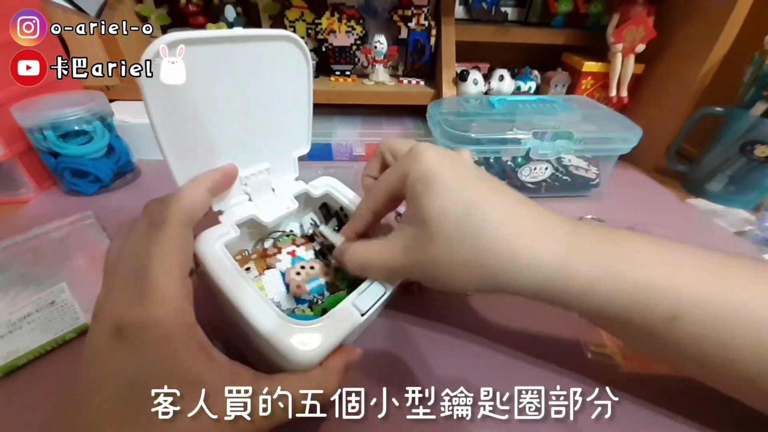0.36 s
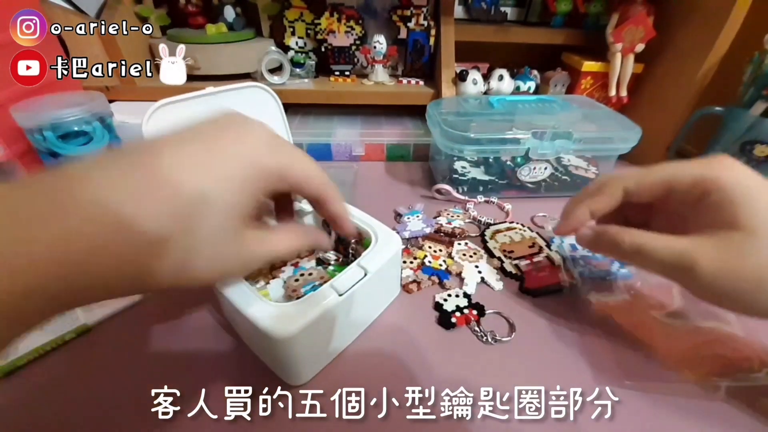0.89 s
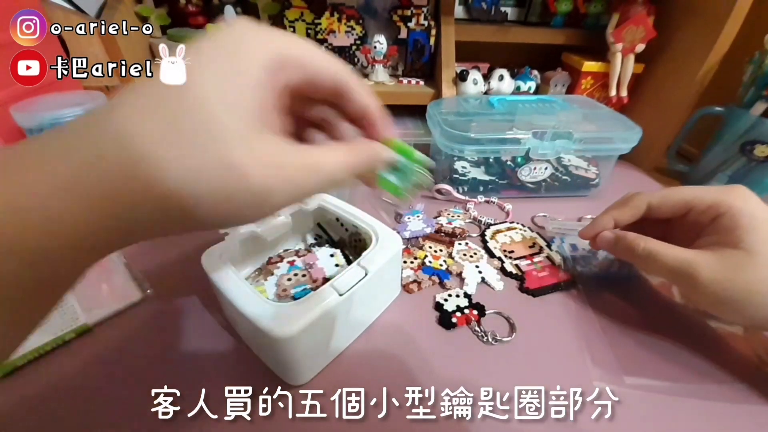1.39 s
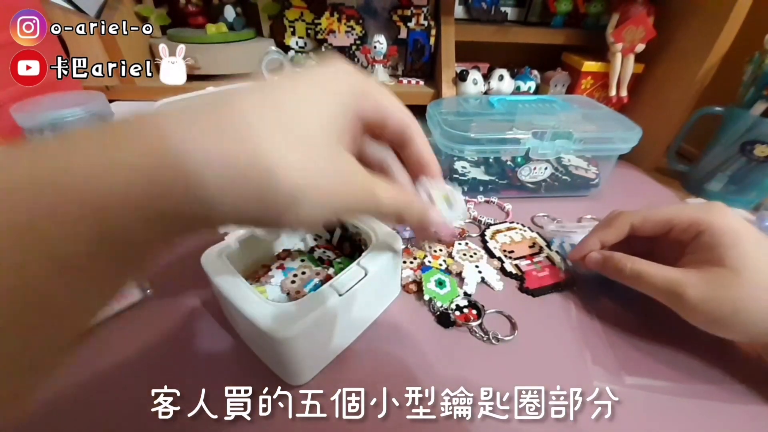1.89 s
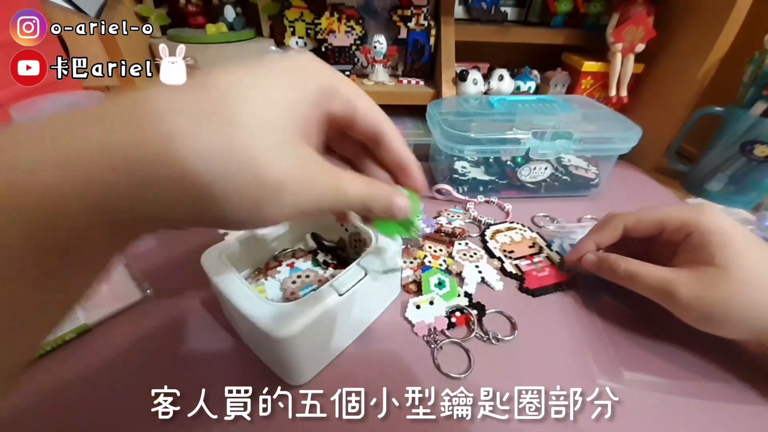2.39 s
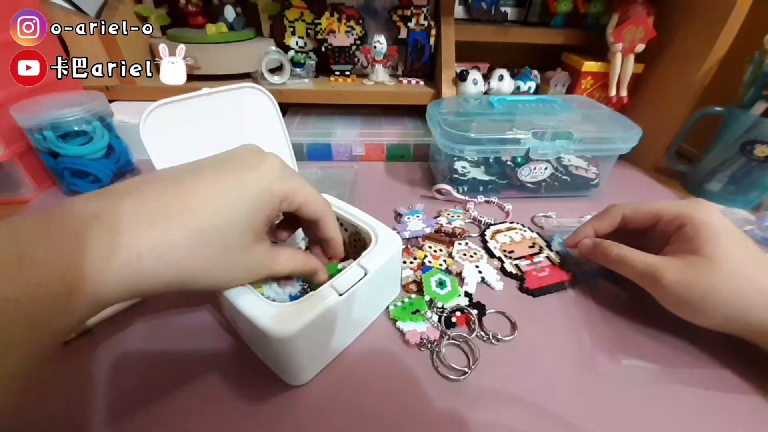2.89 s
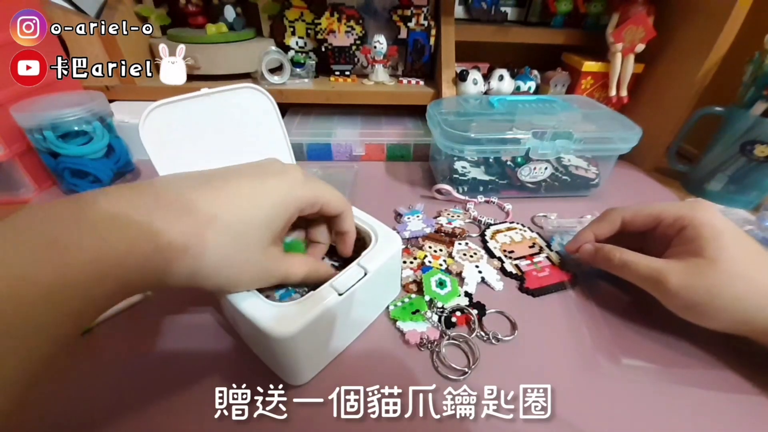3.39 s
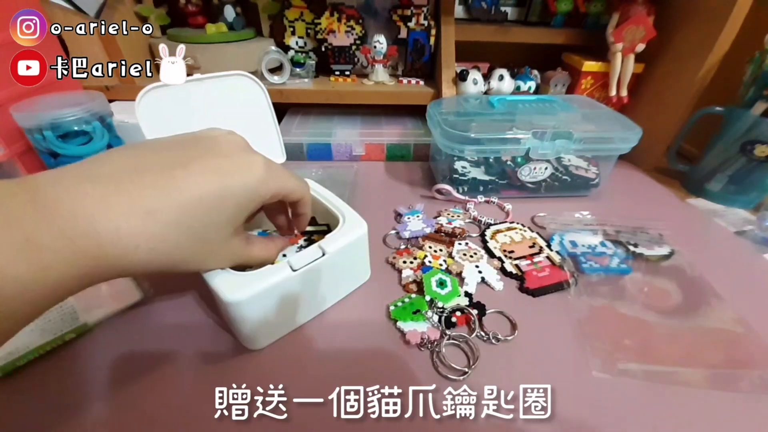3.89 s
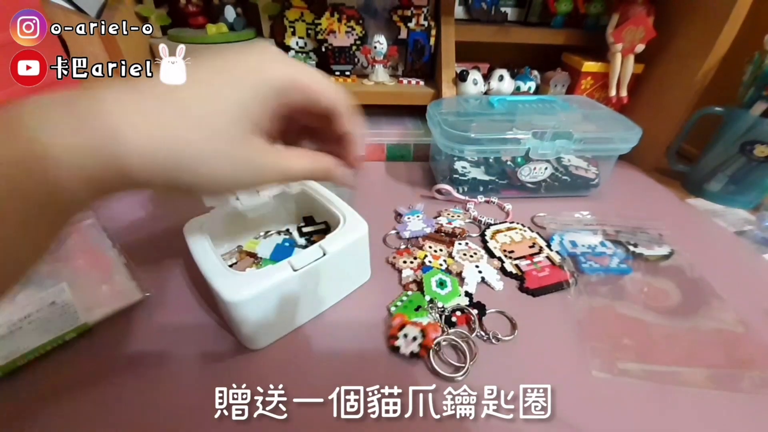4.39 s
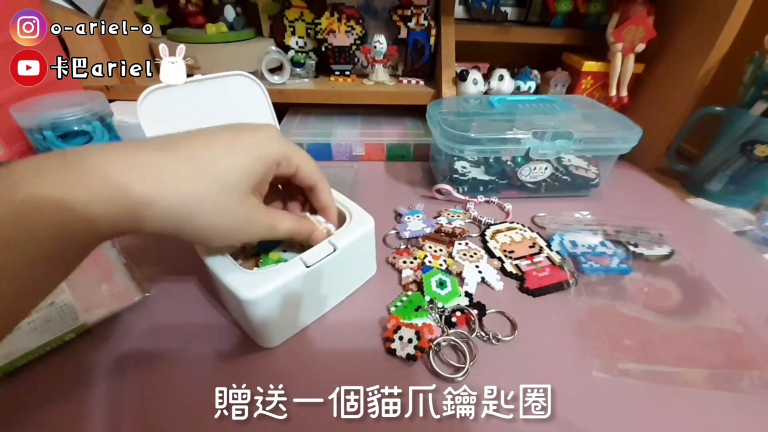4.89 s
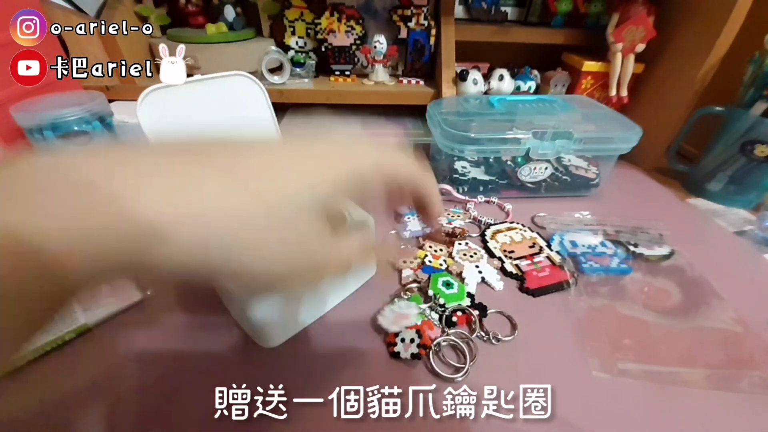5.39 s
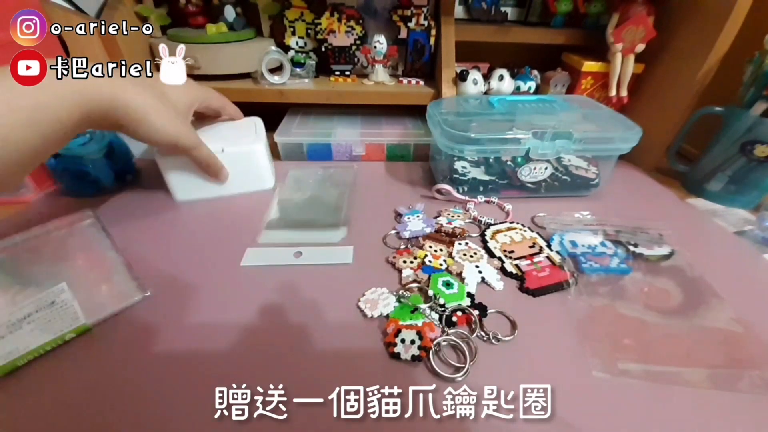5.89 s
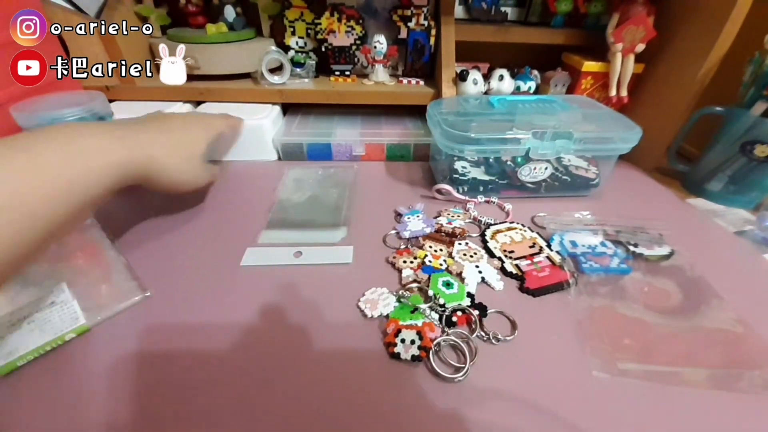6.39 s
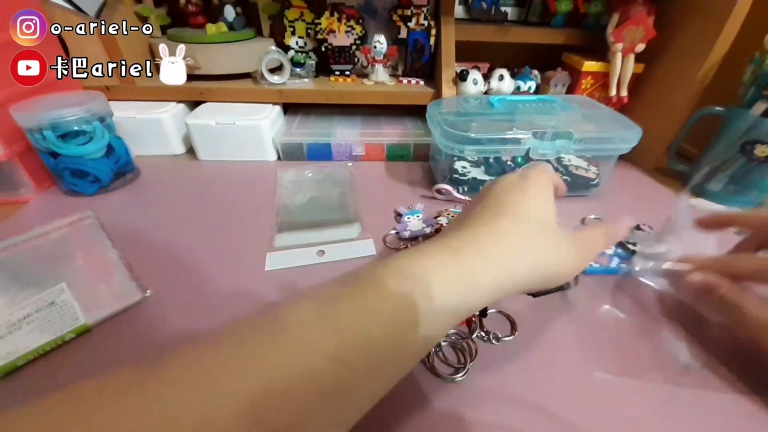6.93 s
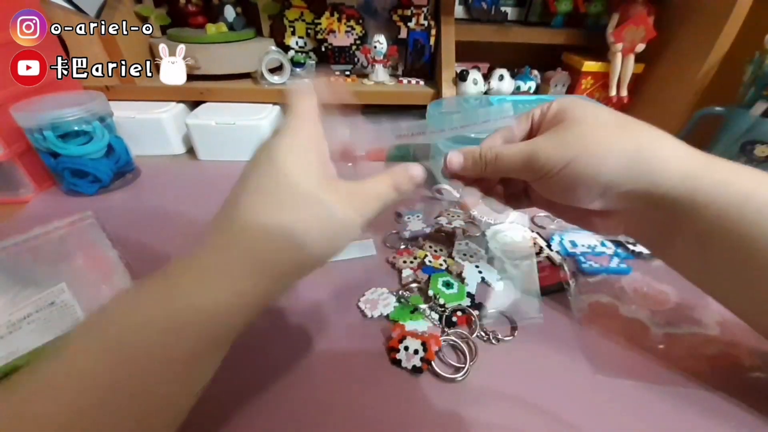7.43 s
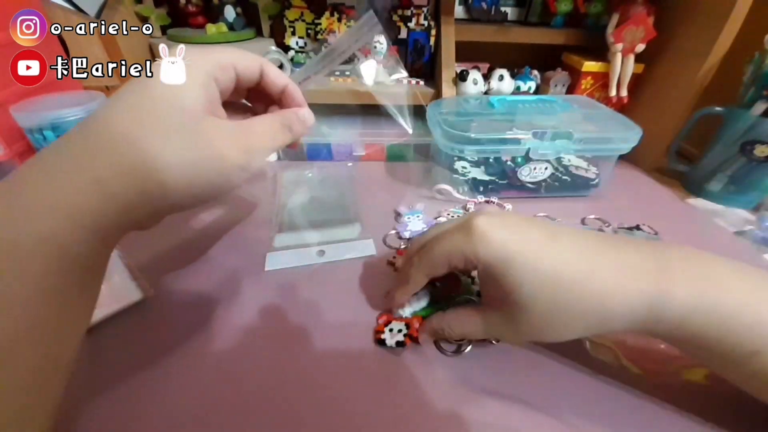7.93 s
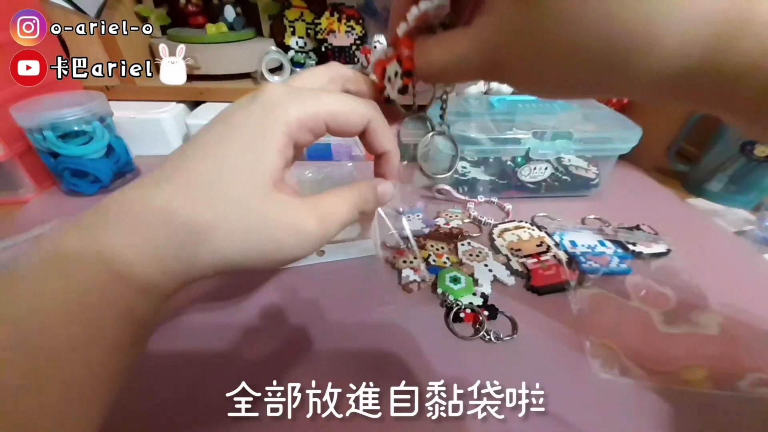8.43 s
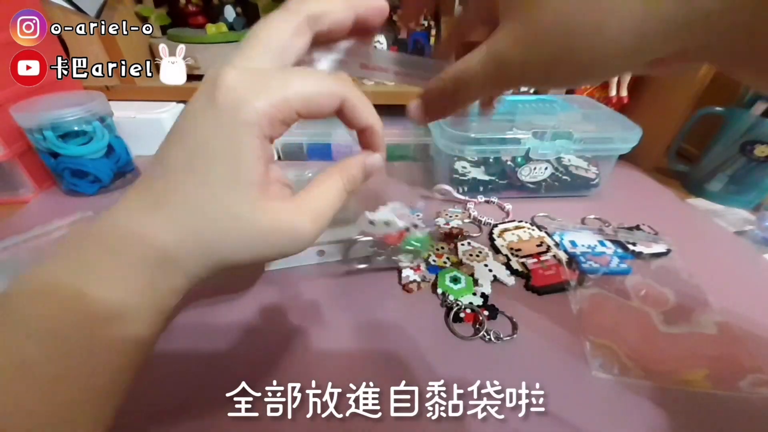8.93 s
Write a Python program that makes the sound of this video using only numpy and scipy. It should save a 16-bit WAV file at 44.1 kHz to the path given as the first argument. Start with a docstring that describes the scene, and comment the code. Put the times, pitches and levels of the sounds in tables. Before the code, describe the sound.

Dry, close stereo pickup at a table in a quiet small room, with faint air and microphone hiss. From 0 to 0.7 s a hollow plastic box opens with soft knocks and a light rattle. From 0.9 to 5.3 s fingers rummage through small plastic bead charms in uneven strokes, with bright ticking, hollow rattling and short woody clacks, strongest around 1.7 to 2.0, 3.2 and 4.6 to 5.1 s. Low air puffs buffet the left side around 2.7 to 3.2 and 4.3 to 4.6 s. At 5.56 s the lid snaps shut; contents rattle as the box is carried, and it lands with a loud hard crack at 6.07 s. Small settling taps fade into near silence around 6.4 s. From 6.8 s pieces tick, then thin film crinkles and pops from 7 s, with a weak puff near 8.2 s. At about 8.9 s a sharp bright snap and dense crackle end it.

```python
"""Small plastic bead charms are rummaged by hand in a hollow plastic box and dropped on a table; the box is shut and
shelved, then a clear film bag crinkles. Streams of random contacts ring resonances of box, table and film and colour
the beads; short notes and noise bursts make the single blows, snaps and cracks.
Air stirred by the passing arm buffets the left microphone port with low noise.
Close pickup in a quiet small room, two ports a few centimetres apart, over room air and microphone hiss."""
import sys
import numpy as np
from scipy import signal
from scipy.fft import rfft, irfft, next_fast_len
from scipy.io import wavfile
from scipy.ndimage import uniform_filter1d, map_coordinates

SR = 44100
rng = np.random.default_rng(int(sys.argv[2]) if len(sys.argv) > 2 else 0)


def convert_level_to_amplitude(level_db):
    """Map a level in decibels to its linear amplitude factor."""
    exponent = np.asarray(level_db, float) / 20
    return 10 ** exponent


def inscribe(sig):
    """Save sig as 16-bit PCM at rate SR to the path in sys.argv[1].

    A 1-D sig is mono; a 2-D sig holds one channel per row.
    Samples are clipped to [-1, 1] before scaling.
    """
    pcm = np.round(np.clip(np.atleast_2d(sig).T, -1, 1) * 32767)
    wavfile.write(sys.argv[1], SR, pcm.astype(np.int16))


N = 399105  # length in samples

# hand strokes through charms and film: start [t/s], length [t/s], hollow knock, bead tick, crackle [relative level/dB]
STROKES = [(0.0, 0.067, -52.5, -100, -70.5), (0.291, 0.175, -51.5, -61, -60),
           (0.463, 0.096, -55.5, -65, -62), (0.565, 0.2, -52, -77, -52), (0.93, 0.13, -52.5, -68, -80),
           (0.98, 0.37, -71.5, -63, -60), (1.138, 0.033, -46.5, -43.5, -49), (1.438, 0.08, -91, -78, -65),
           (1.504, 0.1, -49.5, -64.5, -46), (1.64, 0.1685, -49, -42.5, -45),
           (1.951, 0.084, -65, -56, -41.5), (2.123, 0.17, -43, -47, -50.5),
           (2.466, 0.087, -47.5, -54.5, -38.5), (2.752, 0.237, -48.5, -46, -47),
           (3.009, 0.154, -45.5, -44, -46.5), (3.171, 0.065, -39, -41.5, -46),
           (3.308, 0.1364, -44.5, -50.5, -53), (3.358, 0.061, -43.5, -38.5, -43.5),
           (3.454, 0.1625, -55.5, -56.5, -55.5), (3.768, 0.083, -65.5, -56.5, -62),
           (3.956, 0.088, -44, -44.5, -43), (4.059, 0.073, -47, -47, -46.5),
           (4.282, 0.042, -50.5, -85, -47.5), (4.345, 0.083, -48, -76, -44.5),
           (4.516, 0.067, -40, -40, -41.5), (4.683, 0.225, -38, -36.5, -43.5),
           (4.876, 0.275, -48.5, -48, -52.5), (5.258, 0.1475, -52.5, -78.5, -50),
           (5.419, 0.084, -57, -80.5, -70.5), (5.561, 0.036, -32, -42.5, -48),
           (5.597, 0.32, -53.5, -60, -63), (5.802, 0.26, -50, -50, -55), (6.087, 0.068, -58, -60, -66),
           (6.202, 0.19, -64, -123, -83), (6.773, 0.19, -71, -61, -57), (6.788, 0.097, -47, -43.5, -43.5),
           (7.057, 0.126, -48.5, -51, -64), (7.201, 0.102, -47, -47.5, -53), (7.368, 0.12, -58.5, -66, -74),
           (7.496, 0.05, -44, -45, -57), (7.532, 0.109, -50.5, -54, -51), (7.649, 0.085, -48.5, -46, -44.5),
           (7.74, 0.117, -65, -67, -63), (7.859, 0.113, -49, -52, -41), (7.964, 0.213, -57, -58, -52.5),
           (8.182, 0.065, -75, -60.5, -54), (8.341, 0.089, -52, -51, -50), (8.496, 0.098, -64, -63.5, -57),
           (8.639, 0.23, -58.5, -57.5, -55), (8.84, 0.048, -38, -30.5, -23), (8.88, 0.089, -36, -35, -26),
           (8.959, 0.154, -40.5, -40.5, -35.5)]
# pieces jolted into a short rattle: time of the jolt [t/s], hollow knock, bead tick, crackle [relative level/dB]
RATTLES = [(0.139, -52, -51, -45.5), (0.169, -38.5, -36.5, -38.5), (0.353, -60, -44, -44),
           (0.413, -36, -34, -36), (0.451, -78, -43.5, -34.5), (0.659, -38.5, -81, -54),
           (1.051, -31.5, -29, -35), (1.106, -31, -36.5, -39.5), (1.264, -39, -31, -30.5),
           (1.31, -35, -56, -54), (1.564, -37, -44.5, -27.5), (1.753, -32, -43, -42.5),
           (2.174, -38, -29, -37), (2.326, -46, -40, -44), (2.523, -32, -47, -30), (2.826, -41, -40, -45),
           (3.117, -34.5, -36.5, -41), (3.278, -41.5, -42.5, -42), (3.65, -53, -41, -47),
           (4.005, -29.5, -25.5, -28.5), (4.157, -30, -42.5, -53), (4.182, -30.5, -53, -65),
           (4.378, -39.5, -62, -30), (4.79, -30, -26, -33.5), (4.882, -52, -50, -38),
           (5, -29.5, -30.5, -35), (5.039, -37, -39.5, -42), (5.364, -71, -73, -35.5),
           (5.679, -34.5, -52, -52), (5.76, -41.5, -37, -42.5), (5.858, -26.5, -30, -35.5),
           (5.911, -26.5, -26.5, -36), (5.973, -28, -34.5, -41.5), (6.118, -37, -66, -59),
           (6.209, -42.5, -62, -61), (7.132, -56, -51, -36), (7.417, -34.5, -44.5, -45.5),
           (7.514, -47, -29, -16.5), (7.908, -36, -49, -38), (8.228, -34.5, -44, -55),
           (8.471, -38.5, -40, -44), (8.534, -50, -54, -39), (8.885, -17.5, -27, -22.5)]
# single blows: start [t/s], knock [relative level/dB], knock pitch [f/Hz], snap, table thud [relative level/dB]
BLOWS = [(0.016, -26.5, 494, -72, -58), (0.19, -48, 135, -80, -51), (0.538, -22, 1430, -27.5, -83),
         (0.586, -37, 610, -53.5, -40.5), (1.224, -32.5, 720, -36, -80), (1.354, -24.5, 600, -38, -64),
         (1.713, -13, 1420, -42, -77), (1.89, -13, 1306, -24.5, -54), (2.008, -12, 1230, -28, -43.5),
         (2.406, -22.5, 1190, -33.5, -70), (2.479, -24.5, 1430, -54, -42), (2.781, -23, 750, -17, -70),
         (3.207, -13.5, 1740, -27.5, -50), (4.557, -27.5, 486, -19, -61), (4.656, -14.5, 795, -27.5, -68),
         (4.769, -19, 690, -15.5, -64), (5.116, -18.5, 1510, -22, -55), (5.278, -28, 1190, -38, -53),
         (5.52, -29.5, 1310, -21.5, -60), (5.565, -18, 607, -29.5, -30.5), (5.726, -29.5, 1000, -28.5, -78),
         (5.906, -29, 450, -22, -30), (6.072, -9, 730, -17, -18), (6.313, -31, 522, -48.5, -33.5),
         (7.955, -25.5, 1460, -35, -90), (8.445, -32, 1066, -28, -44), (8.778, -34.5, 553, -20, -38),
         (8.9275, -20, 1290, -10.5, -30.5)]
# small clacks of one piece on the hollow box: start [t/s], knock [relative level/dB], pitch [f/Hz]
TAPS = [(0.229, -44.5, 930), (0.937, -34.5, 776), (0.987, -33.5, 710), (1.517, -41, 1410),
        (1.794, -28, 1220), (1.997, -23, 1370), (4.635, -29.5, 765), (4.679, -26, 770), (4.729, -32, 686),
        (4.797, -26, 735), (4.811, -35, 760), (4.836, -31, 750), (4.886, -27, 770), (4.898, -46, 790),
        (5.078, -46, 774), (5.211, -26, 1320), (5.838, -32, 500), (5.955, -29.5, 430), (6.034, -32, 413),
        (6.168, -40.5, 544), (6.234, -39, 510), (6.287, -35.5, 400)]
# a tap is a blow without snap or thud
KNOCKS = BLOWS + [(start, db, hz, -np.inf, -np.inf) for start, db, hz in TAPS]
# rattle left by a blow: knock over the blow's knock, tick over its snap, crackle over its snap [level/dB]
AFTER_BLOW_DB = (-7.5, -10.5, -6)
# single ticks of rings and beads, creases of the bag popping: start [t/s], bright part, body [relative level/dB]
SNAPS = [(0.68, -23.5, -54), (1.341, -48, -25.5), (1.455, -40, -68), (1.476, -37, -59), (6.469, -52, -62),
         (6.814, -11, -33), (6.911, -24, -27), (7.075, -19.5, -48), (7.234, -22, -19.5), (7.388, -55, -54),
         (7.4128, -31, -36), (7.431, -42, -23.5), (7.4845, -60, -34), (7.5102, -16.5, -25),
         (7.5287, -26, -20.5), (7.582, -18.5, -49), (7.6, -26.5, -43), (7.618, -46, -23), (7.702, -24, -32),
         (7.7154, -29, -25), (7.7308, -28, -29), (7.7694, -32, -51), (7.8163, -41, -52), (7.9086, -26, -41),
         (8.031, -26, -32), (8.0877, -32, -52), (8.133, -24.5, -35.5), (8.2073, -36, -58),
         (8.3515, -14, -66), (8.4054, -26, -29), (8.46, -20.5, -25.5), (8.682, -22.5, -33),
         (8.7098, -26, -36), (8.7394, -28, -60), (8.7694, -13.5, -16), (8.9369, 5, -35), (8.972, -17, -33)]
# hard cracks as the lid shuts and the box hits the shelf: start [t/s], crack [relative level/dB]
LANDINGS = [(5.566, -17.5), (6.07, -1.5)]
# gusts on the left port, a list of points for each: time [t/s], low push [level/dB]
GUSTS = [
    [(2.63, -67), (2.69, -22), (2.77, -20), (2.83, -29.5), (2.94, -28.5), (3.01, -45.5), (3.06, -33.5),
     (3.12, -43), (3.15, -28.5), (3.21, -33), (3.27, -61.5)],
    [(4.2, -51), (4.3, -36.5), (4.43, -31), (4.46, -19), (4.5, -18), (4.525, -26), (4.56, -16.5),
     (4.61, -16.5), (4.65, -53)],
    [(7.98, -48), (8.02, -39.5), (8.1, -53.5), (8.18, -25.5), (8.25, -63)],
]

# spans in which the whole box is opened, shut or carried: from [t/s], to [t/s]
BOX_MOVED = [(0, .8), (5.45, 6.45)]
# where the pieces knock: time [t/s], share on the deep floor of the box [0-1; the rest on its wall or the table]
FLOOR_SHARE = [(0, 0.87), (.25, 0.38), (.56, 0.1), (.6, 0.83), (.66, 0.2), (.94, 0.67), (1.4, 0.39),
               (1.5, 0.36), (2.8, 0.42), (4.1, 0.33), (4.5, 0.45), (4.63, 0.45), (5.06, 0.31), (5.15, 0.25),
               (5.48, 0.4), (5.62, 0), (6.4, 0.79), (6.7, 0.35)]
# how much earlier the left port hears the sources: time [t/s], lead [t/ms]
LEFT_LEAD = [(6.4, 0.2167), (6.7, 0.027)]

# hollow box, two floor resonances and then one of the wall: centre [f/Hz], width [f/Hz], relative level [level/dB]
BOX = [(508, 80, -12.5), (765, 118, -10.5), (1375, 580, 0)]
# the whole box rocking and sliding: centre [f/Hz], width [f/Hz], relative level [level/dB]
SHELL = [(400, 120, -4.5), (628, 130, 1)]
# cracking walls of the box: centre [f/Hz], width [f/Hz], relative level [level/dB]
WALLS = [(1360, 570, 5.5), (2640, 450, 6), (3970, 1400, -2.5)]
# table top: centre [f/Hz], width [f/Hz], relative level [level/dB]
TABLE = [(135, 96, 13), (233, 74, 6.5), (350, 76, 10)]
# colour of the bead charms: frequency [f/Hz], relative level [level/dB]
BEADS = [(1700, -7.5), (2400, 4), (3200, 0), (4400, -0.5), (5500, -6), (7000, -6), (8200, -25.5)]
# colour of the bright crackle: frequency [f/Hz], relative level [level/dB]
CRACKLE = [(6800, -7), (7900, 1.5), (8400, 5.5), (10000, 4), (15500, 0)]
# dull body of the film bag: frequency [f/Hz], relative level [level/dB]
FILM = [(45, -41), (120, 11.5), (350, 11.5), (900, -1), (2300, -49)]
# fine wrinkles of the film: frequency [f/Hz], relative level [level/dB]
CREASES = [(1500, -5.5), (2500, -0.5), (7500, -6.5), (8300, -16)]
# low push of a gust: frequency [f/Hz], relative level [level/dB]
LOW_GUST = [(15, -21.5), (40, 1.5), (100, 12), (220, -8), (400, -82)]
# faster flutter of a gust: frequency [f/Hz], relative level [level/dB]
FLUTTER = [(90, -18), (160, -1), (300, -6), (620, -28.5), (900, -57)]
# room air and microphone hiss: frequency [f/Hz], relative density [level/dB]
HUSH = [(25, -33.5), (55, -15.5), (92, -23), (123, -9.5), (195, -30), (249, -26), (714, -39), (7600, -49.5),
        (8800, -41.5), (11000, -41.5), (15500, -47.5)]

SHUT_AT, BAG_FROM = 5.56, 7.0  # the lid closes, the bag comes out (s)
STROKE_RISE_S, STROKE_FALL_S = 0.019, 0.019
STROKE_FADE_DB = -1  # a stroke tires by this from start to end
RATTLE_LEAD_S, RATTLE_RISE_S, RATTLE_T60 = 0.014, 0.019, 0.079  # starts ahead of its time, builds and dies (s)
AFTER_RISE_S, AFTER_T60 = 0.0043, 0.057  # the rattle left by a blow starts with it and dies (s)
CRACK_RISE_S, CRACK_T60 = 0.0041, 0.046  # (s)
FLUTTER_EVEN_DB, FLUTTER_GROWS = -18, 1.92  # push level where the flutter equals it; dB of flutter per dB of push
ROOM_T60 = 0.015  # nearby table, box and shelf (s)
HUSH_DB = -64.5  # rms of the two ports' average


def unit(x):
    """Scaled to rms 1."""
    return x / np.sqrt(np.mean(x ** 2) + 1e-20)


def along(points, hz):
    """Interpolates (Hz, value) points on a log frequency axis."""
    f, v = np.transpose(points)
    return np.interp(np.log(hz + 1), np.log(f + 1), v)


def curves(rows):
    """One value per sample for each column after the time; -120 dB outside."""
    s, *cols = np.transpose(rows)
    return [np.interp(np.arange(N) / SR, s, c, -120, -120) for c in cols]


def filtered(x, response):
    """x times a complex response of frequency."""
    m = next_fast_len(N + 8192)
    return irfft(rfft(x, m) * response(np.fft.rfftfreq(m, 1 / SR)), m)[..., :N]


def coloured(x, spectrum):
    """x through a (Hz, dB) spectrum."""
    return filtered(x, lambda hz: convert_level_to_amplitude(along(spectrum, hz)))


def rung(x, modes):
    """x through a body's (Hz, width Hz, dB) resonances, added with alternating sign."""
    def response(f):
        return sum((-1) ** k * convert_level_to_amplitude(db) * 1j * f * w / (c * c - f * f + 1j * f * w)
                   for k, (c, w, db) in enumerate(modes))
    return filtered(x, response)


def steady(x, span):
    """x brought to about rms 1 over every span of seconds, so that its level follows the hand."""
    return x / np.sqrt(np.abs(uniform_filter1d(x ** 2, int(span * SR))) + 1e-9)


def contacts(rate, spread_db, life):
    """Envelope of random contacts: rate a second, sizes with a long capped tail, each decaying over life s."""
    chance, size = rng.random(N), rng.exponential(size=N)
    spikes = (chance < rate / SR) * convert_level_to_amplitude(spread_db * np.minimum(size, 4))
    return signal.lfilter([1], [1, -np.exp(-1 / (life * SR))], spikes)


def effort():
    """Knock, tick and crackle gains: strokes rise, tire and stop; rattles build and die."""
    gain = np.zeros((3, N + SR))

    def add(start, levels_db, shape):
        first = round(start * SR)
        gain[:, first:first + len(shape)] += np.outer(convert_level_to_amplitude(levels_db), shape)

    for start, length, *levels_db in STROKES:
        t = np.arange(int((length + STROKE_FALL_S) * SR)) / SR
        ramps = np.clip(np.minimum(t / STROKE_RISE_S, (t[-1] - t) / STROKE_FALL_S), 0, 1) ** 2
        add(start, levels_db, ramps * convert_level_to_amplitude(STROKE_FADE_DB * (t / length - 3.5)))

    t = np.arange(SR // 5) / SR

    def swell(rise, t60):
        return np.minimum(t / rise, 1) ** 2 * convert_level_to_amplitude(-60 * np.maximum(t - rise, 0) / t60)

    for start, *levels_db in RATTLES:
        add(start - RATTLE_LEAD_S, levels_db, swell(RATTLE_RISE_S, RATTLE_T60))
    for start, db, hz, snap_db, thud_db in KNOCKS:
        add(start, np.add((db, snap_db, snap_db), AFTER_BLOW_DB), swell(AFTER_RISE_S, AFTER_T60))
    return gain[:, :N]


def shifting(x, depth_db):
    """Every contact meets other pieces: the colour drifts in patches about 1 kHz by 30 ms."""
    z = signal.stft(x, nperseg=128)[2]
    field = uniform_filter1d(rng.standard_normal(z.shape), size=3, axis=0)
    field = uniform_filter1d(field, size=20, axis=1)
    return signal.istft(z * convert_level_to_amplitude(depth_db * unit(field)), nperseg=128)[1][:N]


def stirring():
    """A stream of small contacts knocks the box, ticks the beads and crackles, later in the film bag."""
    t = np.arange(N) / SR
    in_box = t < BAG_FROM
    knock_gain, tick_gain, crackle_gain = effort()
    touch = 1.1 + contacts(rate=500, spread_db=3.5, life=0.0007)  # shared by all three layers

    def own():
        return (touch + contacts(rate=250, spread_db=3.5, life=0.0005)) * rng.standard_normal(N)

    clacks = contacts(rate=110, spread_db=5, life=0.0005) * rng.standard_normal(N)
    dull = own() + 2.5 * clacks
    fine = own() + clacks

    floor = unit(rung(rung(dull, BOX[:2]), [(715, 3200, 0)]))
    wall = unit(rung(rung(dull, BOX[2:]), [(1430, 1300, 0)]))
    on_floor = np.clip(np.interp(t, *np.transpose(FLOOR_SHARE)), 0, 1)
    box = on_floor * floor + (1 - on_floor) * wall
    bag = unit(coloured(dull, FILM)) + convert_level_to_amplitude(-4.0) * wall
    hollow = np.where(in_box, box, bag)
    fine = np.where(in_box, unit(coloured(fine, BEADS)), unit(coloured(fine, CREASES)))

    moved = sum((t >= start) & (t < end) for start, end in BOX_MOVED)
    # a moved box shakes the table
    table = convert_level_to_amplitude(-8.5) * moved * steady(rung(rung(dull, TABLE), [(260, 10000, 0)]), 0.07)
    shut = moved & (t > SHUT_AT)  # then the box also sounds as one shell
    shell = steady(rung(rung(dull, SHELL), [(500, 570, 0)]), 0.026)
    hollow = np.where(shut, convert_level_to_amplitude(-2.0), 1) * steady(hollow, 0.035)

    knock = knock_gain * (hollow + table + shut * shell)
    tick = tick_gain * steady(shifting(fine, depth_db=1.2), 0.045)
    crackle = crackle_gain * steady(coloured(own(), CRACKLE), 0.06)
    return knock + tick + crackle


def hush():
    """Room air and microphone hiss: noise mostly alike at both ports in the bass, hardly in the treble."""
    def turn(f):
        likeness = along([(130, 0.8), (300, 0.31), (700, 0.084)], f)  # (Hz, correlation of the ports)
        return np.arccos(np.clip(likeness, -1, 1)) / 2

    noise = rng.standard_normal((2, N))
    mid, side = filtered(noise, lambda f: [np.cos(turn(f)), np.sin(turn(f))])
    pair = coloured(np.array([mid + side, mid - side]), HUSH)
    return convert_level_to_amplitude(HUSH_DB) * pair / np.std(pair.mean(axis=0))


def blows():
    """Each blow rings a short hollow note, snaps brightly and thumps the table; returns sharp part and thud."""
    knock, snap, thud = np.zeros((3, N + SR))
    t = np.arange(SR // 16) / SR

    def burst(t60):
        return convert_level_to_amplitude(-60 * t / t60) * (1 - np.exp(-t / 0.0016)) * rng.standard_normal(len(t))

    for start, db, hz, snap_db, thud_db in KNOCKS:
        at = slice(round(start * SR), round(start * SR) + len(t))
        # the note falls 60 dB in 17.2 cycles
        note = convert_level_to_amplitude(-60 * t * hz / 17.2) * np.sin(2 * np.pi * hz * t) * (1 - np.exp(-t / 0.00094))
        # a higher, briefer mode gives the crack
        note += 0.48 * convert_level_to_amplitude(-60 * t * hz / 6.9) * np.sin(2 * np.pi * 1.62 * hz * t)
        knock[at] += convert_level_to_amplitude(db + 7.0) * note
        snap[at] += convert_level_to_amplitude(snap_db + 12.5) * burst(0.0037)
        thud[at] += convert_level_to_amplitude(thud_db + 22.0) * burst(0.075)
    bright = convert_level_to_amplitude(8.5) * coloured(snap[:N], BEADS) + coloured(snap[:N], CRACKLE)
    return knock[:N] + bright, rung(rung(thud[:N], TABLE[1:]), [(300, 450, 0.014)])


def snaps():
    """A ring or bead ticks or a crease pops over: a very short wide noise click, bright part and body."""
    body, bright = np.zeros((2, N + SR))
    t = np.arange(SR // 50) / SR
    for start, db, body_db in SNAPS:
        click = convert_level_to_amplitude(-60 * t / 0.007) * (1 - np.exp(-t / 0.0004)) * rng.standard_normal(len(t))
        at = slice(round(start * SR), round(start * SR) + len(t))
        bright[at] += convert_level_to_amplitude(db + 4.0) * click
        body[at] += convert_level_to_amplitude(body_db + 11.5) * click
    return coloured(bright[:N], CRACKLE) + rung(body[:N], [(2000, 2370, 0.0037)])


def gusts():
    """Eddies of stirred air: a lumpy low push and a faster flutter that grows with it."""
    low_db = np.max([curves(rows)[0] for rows in GUSTS], axis=0)
    flutter_db = FLUTTER_EVEN_DB + FLUTTER_GROWS * (low_db - FLUTTER_EVEN_DB)

    def eddies():
        return (0.5 + contacts(rate=33, spread_db=2.5, life=0.011)) * rng.standard_normal(N)

    push = convert_level_to_amplitude(low_db) * steady(coloured(eddies(), LOW_GUST), 0.52)
    flutter = convert_level_to_amplitude(flutter_db) * steady(coloured(eddies(), FLUTTER), 0.091)
    return push + flutter


def landing():
    """Hard cracks of the box walls: resonant noise that rises fast and dies."""
    walls = unit(rung(rung(rng.standard_normal(N), WALLS), [(2175, 2400, 0)]))
    envelope = np.zeros(N)
    for start, db in LANDINGS:
        since = np.maximum(np.arange(N) / SR - start, 0)
        envelope += convert_level_to_amplitude(db - 60 * since / CRACK_T60) * (1 - np.exp(-since / CRACK_RISE_S))
    return walls * envelope


def ports(x, wet_db):
    """Direct sound is later at the right port; a short room echo of random tails differs between the ports."""
    s, ms = np.transpose(LEFT_LEAD)
    i = np.arange(N)
    late = map_coordinates(x, [i - np.interp(i / SR, s, ms) * SR / 1000], order=3)
    size = SR // 20
    tails = rng.standard_normal((12, 2, size)) * convert_level_to_amplitude(-60 * np.arange(size) / SR / ROOM_T60)
    tails = tails / np.linalg.norm(tails, axis=2, keepdims=True)
    # short room echo: one of twelve random tails is drawn every 256 samples
    drawn = rng.integers(len(tails), size=N // 256 + 1).repeat(256)[:N]
    echo = np.zeros((2, N))
    for k, tail in enumerate(tails):
        share = uniform_filter1d(1. * (drawn == k), size=128)
        echo += signal.oaconvolve((x * share)[None], tail, axes=1)[:, :N]
    treble = filtered(echo, lambda f: 1j * f / (1500 + 1j * f))  # bass wraps round both ports alike
    return (np.array([x, late]) + convert_level_to_amplitude(wet_db) * treble) / np.sqrt(1 + convert_level_to_amplitude(wet_db) ** 2)


def scene():
    """Table-top sounds through both ports, gusts on the left (30 dB weaker on the right), hush under all."""
    sharp, thud = blows()
    near = ports(stirring() + landing(), wet_db=2.5)
    near = near + ports(sharp + thud + snaps(), wet_db=-3)
    return near + gusts() * convert_level_to_amplitude([[0], [-30]]) + hush()


def low_pass(x):
    """Removes everything above the highest recorded frequency."""
    return signal.sosfilt(signal.butter(12, 17100, fs=SR, output="sos"), x)


def record(dry):
    """Steep band limit at 16 kHz, then clipping at full scale."""
    limited = filtered(dry, lambda hz: 1 / (1 + (hz / 16000) ** 240))
    mix = np.clip(limited, -1, 1)
    return low_pass(mix)


dry = scene()
out = record(dry)
inscribe(out)
```